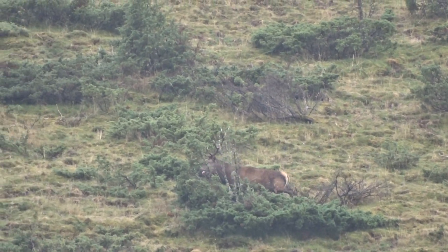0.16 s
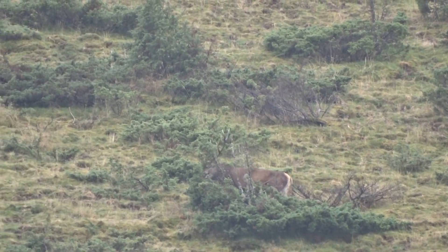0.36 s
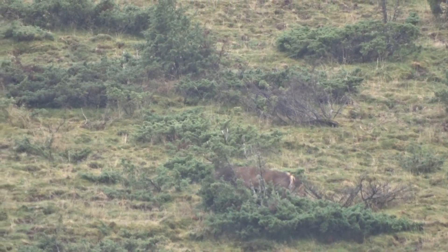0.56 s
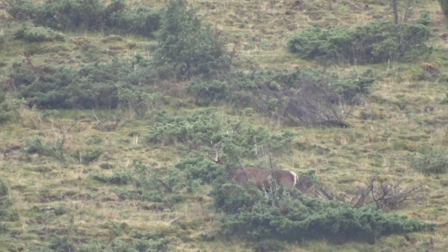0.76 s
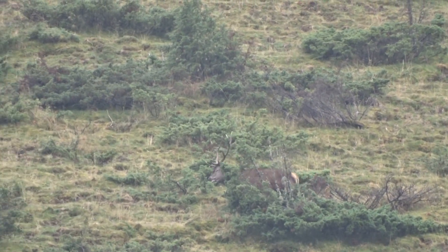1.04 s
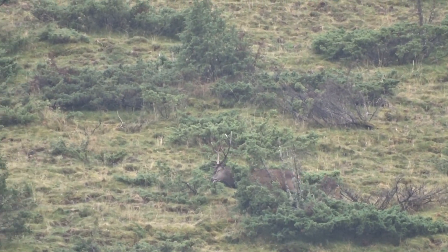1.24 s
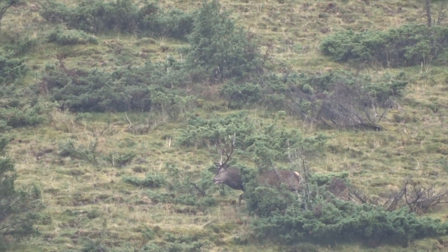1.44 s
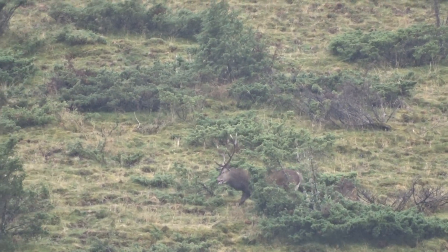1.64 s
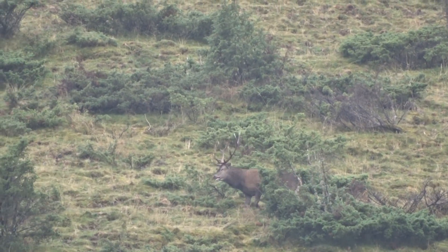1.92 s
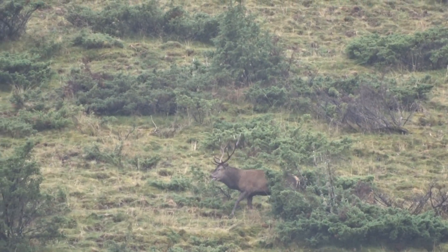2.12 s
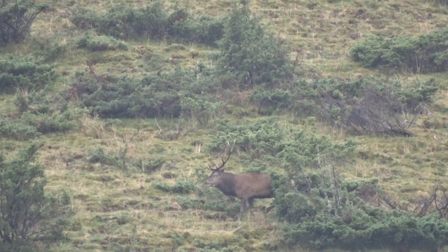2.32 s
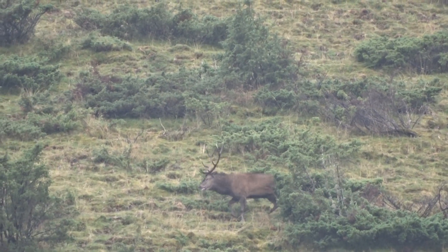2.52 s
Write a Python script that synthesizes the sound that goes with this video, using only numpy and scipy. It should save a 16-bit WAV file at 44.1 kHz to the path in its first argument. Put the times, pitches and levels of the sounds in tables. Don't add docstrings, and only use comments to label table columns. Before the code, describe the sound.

Steady broad hiss of wind and a far stream on an open hillside, with small water plops, dry grass swishes, camera ticks, faint distant cowbells and a low stag roar, heard through a camera's stereo microphone.

```python
import sys
import numpy as np
from scipy import signal
from scipy.fft import rfft, irfft
from scipy.io import wavfile
from scipy.ndimage import uniform_filter1d

SR = 44100
rng = np.random.default_rng(int(sys.argv[2]) if len(sys.argv) > 2 else 0)


def store_pcm(level_fs):
    pcm = np.round(np.clip(level_fs, -1, 1) * 32767).astype(np.int16)
    wavfile.write(sys.argv[1], SR, np.atleast_2d(pcm).T)


def amplitude_ratio(level_db):
    exponent = np.asarray(level_db, float) / 20
    return 10 ** exponent


N = 118188

NEAR_PAN_DB = -3.5


def curve(hz, table):
    table = np.array(table, float)
    return np.interp(np.log(hz + 1), np.log(table[:, 0]), table[:, 1])


def walk(rate):
    k = int(SR / rate)
    held = np.repeat(rng.standard_normal(N // k + 1), k)
    return 1.5 * uniform_filter1d(uniform_filter1d(held, k), k)[:N]


def level(x, db):
    return x * amplitude_ratio(db) / np.sqrt(np.mean(x ** 2))


def pan(x, db):
    return x * amplitude_ratio(np.array([[db], [-db]]) / 2)


def band_noise(low_hz, high_hz):
    band = signal.butter(2, [low_hz, high_hz], "band", fs=SR, output="sos")
    return signal.sosfilt(band, rng.standard_normal(N))


def hiss(table, db, swell):
    swell_db, flicker_db = 0.5, 0.16
    hz = np.fft.rfftfreq(N, 1 / SR)
    spectrum = rfft(rng.standard_normal(N)) * amplitude_ratio(curve(hz, table))
    half_octave = 2 * np.log2(hz / 20 + 1)
    out = 0
    for k in range(20):
        share = np.clip(1 - abs(half_octave - k), 0, 1)
        loudness = amplitude_ratio(swell_db * swell + flicker_db * walk(9.15))
        out = out + irfft(spectrum * share, N) * loudness
    return level(out, db)


def hillside():
    # frequency_hz, density_db (per Hz)
    air_low = [(18, -61), (30, -49.5), (177, -10.5), (297, -15.5), (452, -2.5), (534, -2.5), (960, -2),
               (1640, -7), (2130, -10), (3610, -120)]
    air_high = [(1200, -22.5), (1640, -13.5), (2260, 1.5), (4300, -4), (7230, -1.5), (9070, -8.5),
                (12500, -14), (15700, -12.5)]
    # frequency_hz, density_db (per Hz)
    wide = [(25, -31), (273, -14.5), (469, -1.5), (928, -2.5), (2580, -8.5), (6440, -17), (9800, -12),
            (15700, -35)]
    # frequency_hz, left_minus_right_db
    ports = [(200, 0), (700, 0.5), (950, 4.5), (1290, -4), (2380, -3), (4400, -3), (7000, -1), (10000, -4)]
    # time_s, gain_db
    gusts = [
        (0, 0),
        (.3, -0.4),
        (.55, .5),
        (.95, 0.5),
        (1.2, 1),
        (1.45, 0.24),
        (1.9, 0),
        (2.3, 0),
        (2.68, 0),
    ]
    leaves_db = 1.3
    swell = walk(3.29)
    mid = hiss(air_low, -63.5, swell) + hiss(air_high, -57, swell + leaves_db * walk(22.2))
    side = hiss(wide, -64, swell) * np.array([[1], [-1]])
    gust_s, gust_db = np.array(gusts).T
    air = (mid + side) * amplitude_ratio(np.interp(np.arange(N) / SR, gust_s, gust_db))
    tilt = curve(np.fft.rfftfreq(N, 1 / SR), ports) / 2
    return irfft(rfft(air) * amplitude_ratio(np.array([tilt, -tilt])), N)


def plop(out, start, db, hz, t60, side_db, sizes):
    spread, glide = 0.05, 0.6
    scatter_s, rise_s = 0.007, 0.003
    for k, size in enumerate(sizes):
        i = min(int((start + k * scatter_s * abs(size)) * SR), N - 1)
        t = np.arange(min(int(t60 * SR), N - i)) / SR
        wave = np.sin(2 * np.pi * hz * (1 + spread * size) * (t + glide * t * t))
        envelope = amplitude_ratio(db - 60 * t / t60) * (1 - np.exp(-t / rise_s))
        out[:, i:i + len(t)] += pan(wave * envelope, side_db)


def stream():
    # start_s, level_db, pitch_hz, t60_s, left_minus_right_db
    plops = [(.095, -58, 838, 0.079, 2), (.105, -53, 2265, 0.047, -13), (.19, -55.5, 595, 0.079, -3),
             (.228, -56.5, 646, .06, -2), (.467, -47.5, 658, 0.044, 1), (.497, -52.5, 7040, 0.084, -4),
             (.519, -45, 683, 0.034, -2), (.56, -53, 2310, 0.067, 4), (.69, -53, 1415, 0.042, 2),
             (.765, -58, 1380, 0.029, 22), (.79, -56, 2300, 0.069, -10), (.865, -65, 1750, 0.077, -8),
             (1.34, -50.5, 1392, 0.034, -5), (1.35, -57, 2340, 0.071, -13), (1.43, -59, 665, 0.061, -2),
             (1.458, -53.5, 650, 0.056, -3), (1.805, -68, 163, 0.072, -2), (1.86, -57, 758, 0.091, -2),
             (1.912, -56, 4280, 0.058, 3), (2.113, -54, 3570, 0.11, -4), (2.255, -51, 2780, .04, -1),
             (2.4, -62, 582, 0.14, 5), (2.52, -54.5, 580, 0.049, -5), (2.61, -68.5, 202, 0.095, -5),
             (1.54, -60, 635, .06, 0),
             (0.716, -59, 2390, 0.084, -13), (0.932, -58, 2930, 0.047, -3), (1.06, -55.5, 2530, 0.065, -5),
             (1.17, -52.5, 3000, .05, 0), (1.436, -52, 2770, 0.042, -3), (1.575, -54, 2000, 0.054, -3),
             (0.0091, -55.5, 1970, 0.042, -11), (1.5, -51, 2600, 0.06, -5), (2.47, -56, 3400, 0.098, -3),
             (.87, -58.5, 957, 0.079, 3), (0.3, -58, 800, 0.053, -2), (0.058, -57.5, 960, 0.081, 2)]
    burble_db, burble_tail_db = -72, 2.0
    out = np.zeros((2, N))
    usual_sizes = np.array([0, 1, -1, .5])
    for row in plops:
        plop(out, *row, usual_sizes + 0.25 * rng.uniform(-1, 1, 4))
    for when, pitch, luck, side, *chance in rng.random((400, 7)):
        db = burble_db - burble_tail_db * np.log(luck)
        hz = 450 * 2 ** (2.8 * pitch)
        plop(out, when * N / SR, db, hz, .06, 10 * side - 6, 2 * np.array(chance) - 1)
    return out


def stag():
    # start_s, length_s, level_db
    bursts = [(0.05, 0.11, -73.5), (0.39, .04, -78), (0.854, 0.075, -68.5), (0.967, 0.022, -72),
              (1.052, 0.1, -69), (1.192, 0.025, -73), (1.311, 0.058, -68.5), (1.437, 0.047, -63),
              (1.516, 0.054, -63.5), (1.624, 0.084, -64.5), (1.768, 0.07, -68), (1.994, 0.17, -75),
              (2.246, 0.048, -69), (2.586, 0.052, -78)]
    roar_hz, jitter = 147.3, .045
    throat_hz, throat_width_hz = 442, 30
    edge_s, echo_db, flutter_db = 0.035, -77, 2.5
    t = np.arange(N) / SR
    effort = amplitude_ratio(echo_db)
    for start, length, db in bursts:
        inside_s = np.minimum(t - start, start + length - t)
        effort = effort + amplitude_ratio(db) * np.clip(inside_s / edge_s + .5, 0, 1)
    cycles = np.cumsum(roar_hz * (1 + jitter * walk(130))) / SR
    pulses = np.diff(np.floor(cycles), prepend=0)
    b, a = signal.iirpeak(throat_hz, throat_hz / throat_width_hz, fs=SR)
    throat = signal.lfilter(b, a, signal.lfilter(b, a, pulses))
    voice = level(throat, 0) * effort
    return np.array([level(amplitude_ratio(flutter_db * walk(52.5)), 0) * voice for _ in range(2)])


def grass():
    # centre_s, half_length_s, level_db
    swishes = [(.05, .02, -74), (0.293, 0.022, -62), (0.502, 0.016, -59.5), (.91, .015, -61.5),
               (1.011, .015, -61), (1.324, 0.016, -67), (1.641, 0.017, -62.5), (1.76, 0.0065, -61),
               (1.777, 0.012, -58.5), (1.87, 0.012, -61), (2.092, 0.015, -59.5), (2.286, 0.014, -64),
               (2.352, 0.038, -64), (2.44, 0.037, -68), (2.515, 0.024, -60), (2.56, .03, -61.5),
               (2.65, .02, -65)]
    # low_hz, high_hz
    blade_band = [6200, 8600]
    grain_db = 1.5
    t = np.arange(N) / SR
    blades = level(band_noise(*blade_band) * amplitude_ratio(grain_db * walk(200)), 0)
    stir = sum(amplitude_ratio(db) * np.exp(-((t - centre) / half) ** 2) for centre, half, db in swishes)
    return pan(blades * stir, NEAR_PAN_DB)


def camera():
    # centre_s, peak_db, pitch_hz, rustle_db
    ticks = [(0.1697, -35, 11000, -67), (.3835, -45, 10000, -62.5), (.6856, -53, 10000, -78),
             (0.707, -51, 10000, -63), (1.142, -39, 3950, -77), (1.1725, -44, 8900, -66),
             (1.54, -40, 12600, -68), (2.0564, -47, 11000, -68), (2.28, -55, 11000, -65),
             (2.482, -57, 12000, -62), (2.6157, -42, 11500, -65)]
    tick_cycles, rustle_s = 1.25, .009
    ring_hz, ring_db, ring_s = 7350, -6, 0.00059
    t = np.arange(N) / SR
    bright = level(band_noise(6500, 13500), 0)
    out = 0
    for centre, db, hz, rustle_db in ticks:
        tick = np.exp(-((t - centre) * hz / tick_cycles) ** 2) * np.sin(2 * np.pi * hz * (centre - t))
        age = np.maximum(t - centre, 0)
        casing = np.exp(-age / ring_s) * np.sin(2 * np.pi * ring_hz * age)
        rustle = bright * np.exp(-((t - centre) / rustle_s) ** 2)
        out = out + amplitude_ratio(db) * tick + amplitude_ratio(db + ring_db) * casing + amplitude_ratio(rustle_db) * rustle
    return pan(out, NEAR_PAN_DB)


def ring(start, stop, db, t60):
    attack_s, damping_s = .004, .012
    t = np.arange(N) / SR
    age = np.maximum(t - start, 0)
    fade = np.exp(-np.log(1000) * age / t60 - np.maximum(t - stop, 0) / damping_s)
    return amplitude_ratio(db) * (1 - np.exp(-age / attack_s)) * fade


def bell_mode(hz, db, t60, blows):
    shimmer_db, waver_turns = 1.5, .08
    turns = hz * np.arange(N) / SR + waver_turns * walk(50)
    air = amplitude_ratio(shimmer_db * walk(90))
    next_starts = [start for start, _, _ in blows[1:]] + [N / SR]
    envelope = 0
    for (start, blow_db, stop), next_start in zip(blows, next_starts):
        envelope = envelope + ring(start, min(stop, next_start), db + blow_db, t60)
    return air * np.sin(2 * np.pi * turns) * envelope


def big_bell():
    # pitch_hz; then level_db, t60_s
    long_hz = [1989, 2662]
    long_modes = [(0, 1.0), (0, 1.6)]
    # pitch_hz; then level_db, t60_s
    clank_hz = [3564, 3426, 5060, 5222, 6283, 4020, 5512]
    clank_modes = [(1, .3), (-3, .2), (0, .3), (-4, .22), (-1, .18), (-2, .35), (1.5, .12)]
    # start_s, lower_db, upper_db, stop_s
    hits = [(.225, -80, -62, .5), (.33, -80, -64, .5), (.44, -80, -63, .5), (.57, -65, -62, .8),
            (.69, -72, -62, .8), (.79, -72, -64, 1.0), (1.05, -78, -67, 1.2), (1.14, -67, -67, 1.3),
            (1.27, -68, -67, 1.4), (1.382, -55, -65, 1.418), (1.452, -65, -60, 1.49),
            (1.525, -56.5, -59, 1.56), (1.575, -62, -61.5, 1.64), (1.66, -62, -59.5, 1.69),
            (1.712, -66, -56.5, 1.745), (1.77, -73, -66, 1.95), (1.954, -59.5, -52, 1.972),
            (1.99, -62, -65, 2.02), (2.04, -68, -67, 2.2), (2.1, -65, -66, 2.16), (2.18, -64, -64, 2.22),
            (2.225, -70, -63, 2.25), (2.255, -72, -60, 2.27)]
    # start_s, rim_db, side_db
    clanks = [
        (.49, -68, -80),
        (.6, -70, -68),
        (1.14, -66, -68),
        (1.392, -66, -57),
        (1.715, -72, -59),
        (1.957, -59, -62),
        (1.972, -55, -68),
        (1.995, -64, -75),
        (2.03, -65, -75),
        (2.112, -66, -75),
    ]
    out = 0
    for k, (hz, (db, t60)) in enumerate(zip(long_hz, long_modes)):
        blows = [(hit[0], hit[1 + k], hit[3]) for hit in hits]
        out = out + bell_mode(hz, db, t60, blows)
    for k, (hz, (db, t60)) in enumerate(zip(clank_hz, clank_modes)):
        column = 1 if k < 5 else 2
        blows = [(clank[0], clank[column], clank[0] + 1) for clank in clanks]
        out = out + bell_mode(hz, db, t60, blows)
    return out


def small_bell():
    # pitch_hz; then level_db, t60_s
    mode_hz = [1845, 1165, 1434, 2380, 3671]
    modes = [(0, .9), (-10, 2.5), (-10, .5), (-5, .4), (-9, .4)]
    # start_s, level_db, stop_s
    hits = [(.49, -68, .6), (.543, -58, .57), (.585, -60.5, .61), (.63, -66, .66), (.675, -61, .73),
            (1.15, -70, 1.3), (1.2, -67, 1.3), (1.27, -65, 1.4), (1.38, -66, 1.5), (1.485, -61, 1.53),
            (1.55, -63, 1.58), (2.0, -68, 2.2), (2.1, -67, 2.2)]
    out = 0
    for k, (hz, (db, t60)) in enumerate(zip(mode_hz, modes)):
        blows = [(start, hit_db, stop + (k == 1)) for start, hit_db, stop in hits]
        out = out + bell_mode(hz, db, t60, blows)
    return out


def bells():
    return pan(big_bell() + small_bell(), -4)


def scene():
    return hillside() + stream() + stag() + grass() + camera() + bells()


def roll_off(x):
    return signal.sosfilt(signal.butter(12, 16920, fs=SR, output="sos"), x)


def record(dry):
    passed = np.fft.rfftfreq(N, 1 / SR) < 15770
    cut = irfft(rfft(dry) * passed, N)
    return roll_off(cut)


dry = scene()
out = record(dry)
store_pcm(out)
```